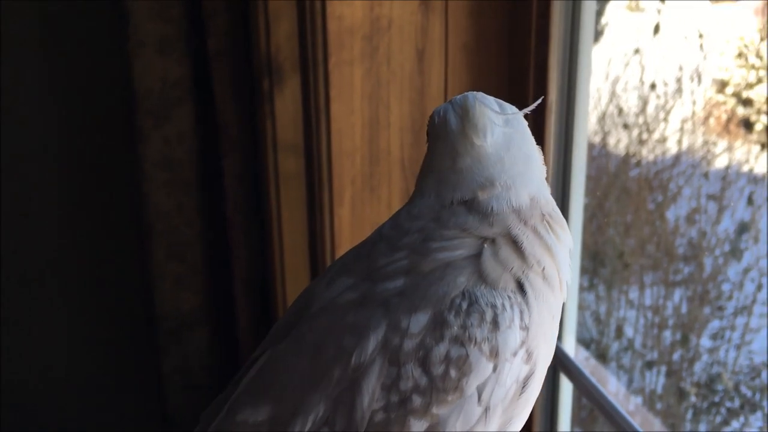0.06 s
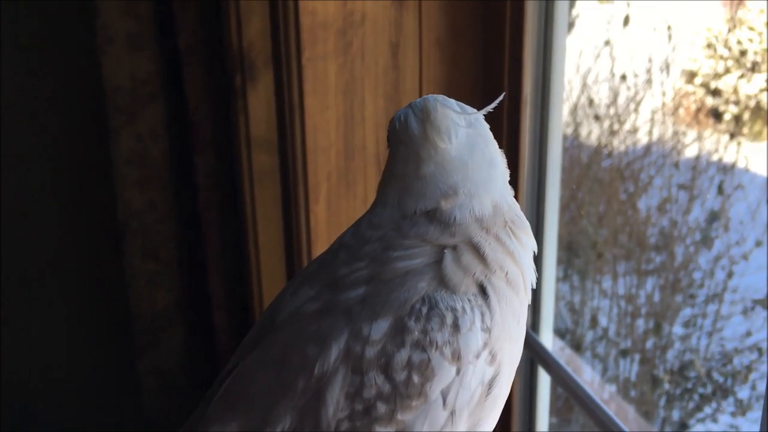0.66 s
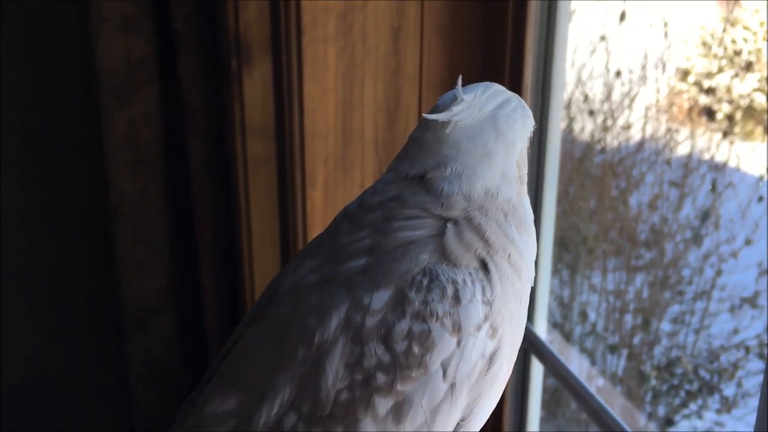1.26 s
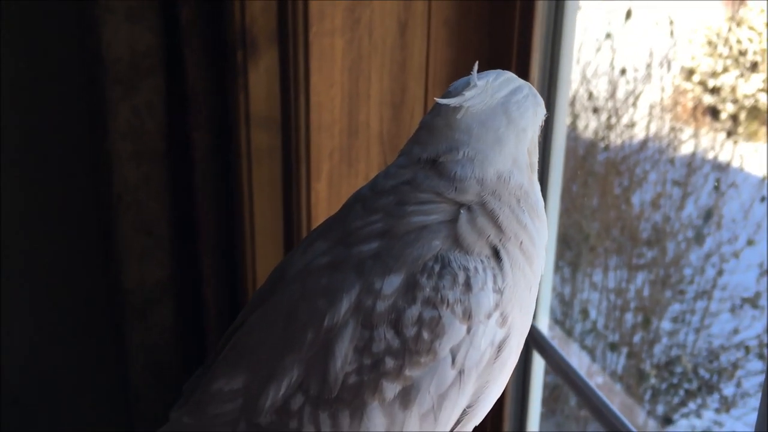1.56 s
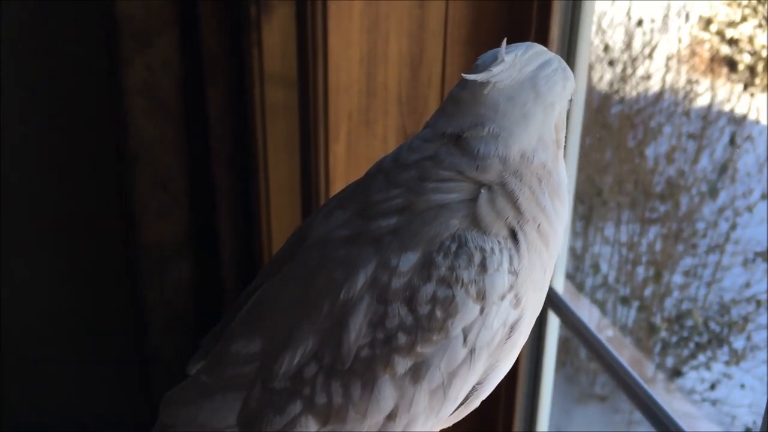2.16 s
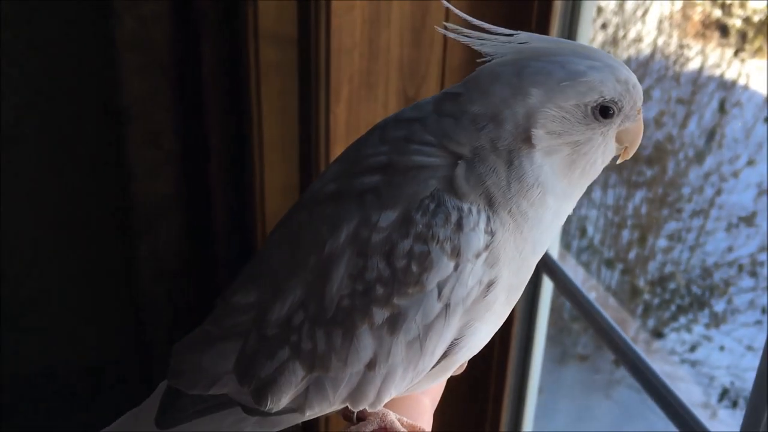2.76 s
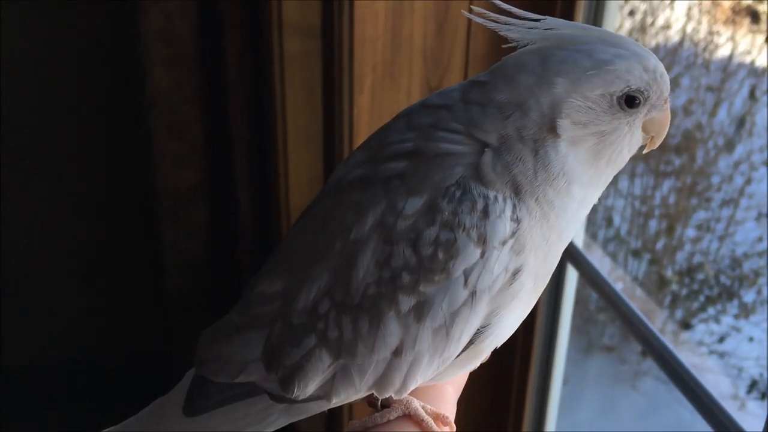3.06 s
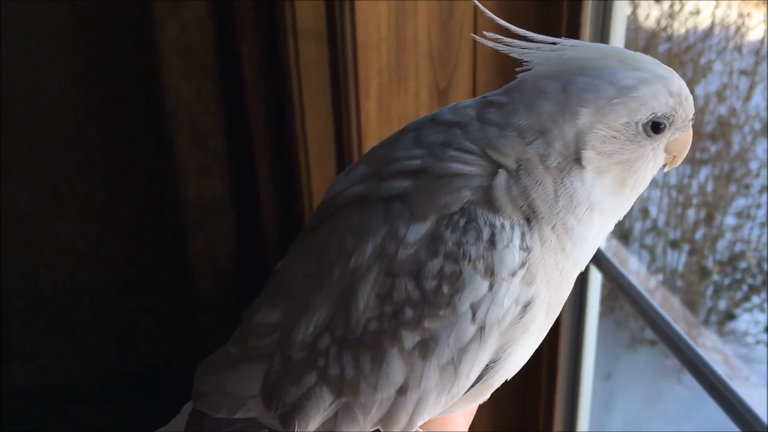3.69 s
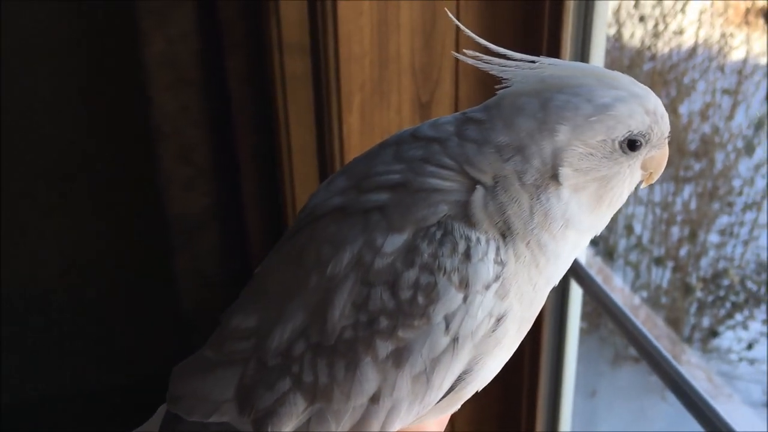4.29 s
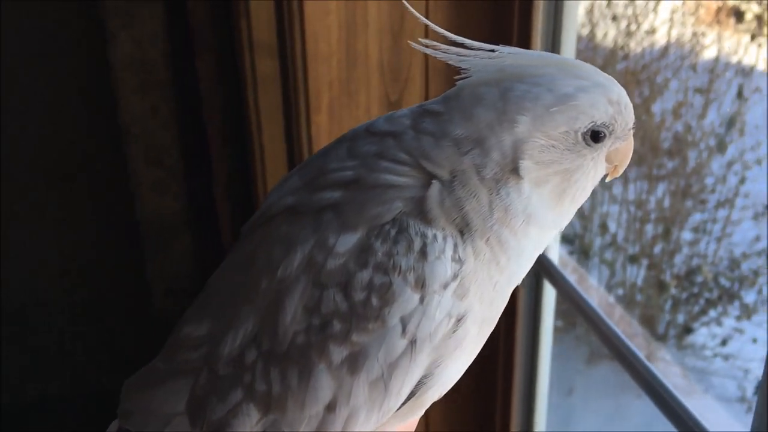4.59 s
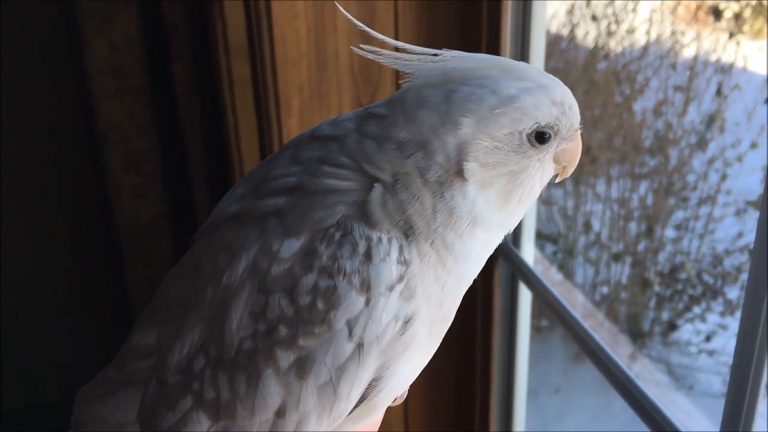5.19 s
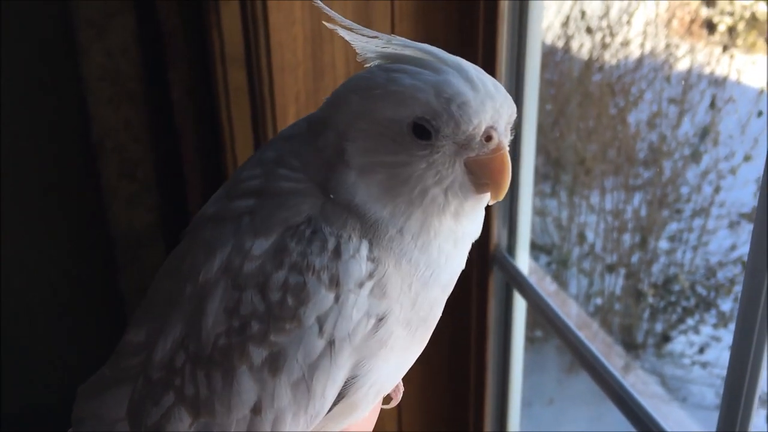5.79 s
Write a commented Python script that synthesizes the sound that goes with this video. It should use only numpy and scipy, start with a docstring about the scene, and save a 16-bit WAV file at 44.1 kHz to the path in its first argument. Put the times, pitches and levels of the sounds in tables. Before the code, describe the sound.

A steady low hum fills a quiet indoor room from start to finish. It comes from a heating blower far off in the house: an even motor drone, a few gently wavering tones above it, and a dull rumble of air in the ducts. A faint, smooth microphone hiss lies underneath.

A small bird is perched near the microphone, but its sounds are tiny and barely rise above the hiss. At about 0.6 seconds it makes one light tick with its beak or claw. Around 3.2 seconds its feathers give a brief, soft, grainy rustle, with two quick high ticks at about 3.3 seconds. A second faint rustle, very slightly squeaky, follows at 3.6 seconds. One last, slightly lower tick comes at about 4.4 seconds, and the blower hums on unchanged.

```python
"""A quiet room in winter, one microphone, a small bird perched nearby. From the start a forced-air
heating blower runs far off in the house: its motor hums at twice the mains rate, its wheel adds
wavering tones, and air rumbles through the ducts. At 0.6 s the bird makes a tiny tick, barely above the
microphone's hiss. Around 3.2 s it shifts its feathers and ticks twice, then shifts again at 3.6 s.
A last tick comes at 4.4 s, and the blower runs on."""
import sys
import numpy as np
from scipy import signal
from scipy.fft import rfft, irfft
from scipy.io import wavfile

SR = 44100
rng = np.random.default_rng(int(sys.argv[2]) if len(sys.argv) > 2 else 0)


def output_pcm(signal):
    """Save a mono or channel-first signal as 16-bit PCM at the path in sys.argv[1].

    Samples are clipped to [-1, 1] before scaling.
    """
    pcm = np.clip(np.atleast_2d(signal).T, -1, 1) * 32767
    wavfile.write(sys.argv[1], SR, np.round(pcm).astype(np.int16))


N = 266672
TIME = np.arange(N) / SR
BIN_HZ = np.maximum(np.arange(N // 2 + 1) * SR / N, 1)


def from_db(db):
    """Decibels to gain."""
    return 10 ** (np.asarray(db) / 20)


def rms_one(x):
    """Scale to an rms of 1."""
    return x / np.sqrt(np.mean(x ** 2))


def spectrum_db(points):
    """Join (f/Hz, level/dB) points by straight lines on a log-frequency axis."""
    hz, db = np.transpose(points)
    return np.interp(np.log(BIN_HZ), np.log(hz), db)


def bell(hz, width_hz):
    """A resonance-shaped bump of height 1 with steep skirts."""
    return 1 / (1 + ((BIN_HZ - hz) / width_hz) ** 2) ** 2


def noise(density):
    """Random noise with the given power per Hz."""
    return irfft(rfft(rng.standard_normal(N)) * np.sqrt(density * SR / 2), N)


def drift(rate_hz):
    """Slow random wandering with a spread of 1."""
    return rms_one(noise(bell(0, rate_hz)))


# Noise floor of the microphone: f/Hz, level/dB per Hz
HISS_FLOOR = [(1000, -113), (3500, -113.5), (6000, -116), (9000, -117.5), (12000, -119.5), (15500, -124)]
# Dips in that floor: f/Hz, width/Hz, gain/dB
HISS_HOLLOWS = [(4960, 360, -4.5), (7550, 1200, -3.5), (10480, 800, -7)]

def microphone_hiss():
    """The microphone's own smooth noise, slightly hollow in three places."""
    dips_db = sum(db * bell(hz, width) for hz, width, db in HISS_HOLLOWS)
    return noise(from_db(spectrum_db(HISS_FLOOR) + dips_db) ** 2)


# Rumble of moving air as it reaches the microphone: f/Hz, level/dB per Hz
AIR_RUMBLE = [(20, -103), (35, -86), (48, -71.5), (64, -77), (130, -76.5), (205, -75.5), (245, -82),
              (330, -87), (410, -87.5), (500, -90.5), (700, -96.5), (1400, -104), (2400, -108),
              (2900, -115), (5000, -125)]
# Duct and room resonances on top of it: f/Hz, width/Hz, level/dB per Hz
DUCT_RESONANCES = [(75, 3.5, -72.5), (96, 4.1, -66), (132.8, 4, -65), (154.4, 3.9, -67.5), (286.5, 8, -70),
                   (324, 23, -72), (539.4, 9.4, -82), (944, 47, -95.5), (1065.6, 12, -92.5),
                   (1263, 20, -100), (2100, 230, -106.5), (2427, 60, -105), (3460, 71, -114)]

def duct_air():
    """Turbulence, dulled on its way through the house, keeps the ducts and the room ringing."""
    ringing = sum(from_db(db) ** 2 * bell(hz, width) for hz, width, db in DUCT_RESONANCES)
    return noise(from_db(spectrum_db(AIR_RUMBLE)) ** 2 + ringing)


# Wheel tones heard from the room: multiple of the shaft rate, rms level/dB, flutter as a share of the tone
WHEEL_TONES = [(3, -56.5, 0.11), (5, -75.5, .4), (10, -77.5, 0.28), (11, -64, 0.49), (15, -59, .35),
               (16, -65.5, 0.21), (18, -71.5, 0.32), (20, -66, 0.53), (22, -69, 1), (54, -81, 0.87)]

def blower_wheel(shaft_hz=18.87, speed_wander=0.00035, wander_hz=0.95, flutter_hz=1.4):
    """Distant tones locked to the shaft; turbulent inflow shakes the strength and phase of each."""
    turns = np.cumsum(shaft_hz * (1 + speed_wander * drift(wander_hz))) / SR
    out = np.zeros(N)
    for multiple, db, flutter in WHEEL_TONES:
        inflow = 1 + flutter * (drift(flutter_hz) + 1j * drift(flutter_hz)) / np.sqrt(2)
        tone = np.exp(2j * np.pi * (round(multiple) * turns + rng.random()))
        out += from_db(db) * rms_one(np.real(inflow * tone))
    return out


# Magnetic hum of the far-off motor: multiple of the mains rate, level/dB relative to hum_db
HUM_PARTIALS = [(2, -.5), (4, -25.5)]

def blower_motor(mains_hz=60, hum_db=-45.5, waver_db=0.85, waver_hz=2.5):
    """The iron is pulled twice in each mains cycle: a hum of steady pitch, wavering slightly in level."""
    hum = np.zeros(N)
    for multiple, db in HUM_PARTIALS:
        cycles = round(multiple) * mains_hz * TIME + rng.random()
        hum += from_db(db) * np.sqrt(2) * np.sin(2 * np.pi * cycles)
    return hum * from_db(hum_db + waver_db * drift(waver_hz))


# Feathers sliding over each other, near the microphone:
# middle t/s, half length/s, rms level/dB, centre f/Hz, width/Hz, squeak rms level/dB
FEATHER_SHIFTS = [(3.233, 0.16, -75.5, 3000, 4000, -90), (3.627, .11, -76, 2300, 2200, -79.5)]
# Resonances of the thin squeak: f/Hz, width/Hz, relative level/dB
SQUEAK_RESONANCES = [(3430, 170, 0), (5850, 300, -12)]

def bird_feathers(grain_db=2.0, grain_hz=110):
    """Each movement swells and fades; barbs catching on one another make it grainy and faintly squeaky."""
    out = np.zeros(N)
    resonances = sum(from_db(db) ** 2 * bell(hz, width) for hz, width, db in SQUEAK_RESONANCES)
    for middle, half_length, db, hz, width, squeak_db in FEATHER_SHIFTS:
        friction = from_db(db) * rms_one(noise(bell(hz, width)))
        squeak = from_db(squeak_db) * rms_one(noise(resonances))
        grain = rms_one(from_db(grain_db * drift(grain_hz)))
        swell = np.exp(-((TIME - middle) / half_length) ** 2)
        out += swell * grain * (friction + squeak)
    return out


# Beak and claws at the nearby perch: t/s, rms level/dB at onset, centre f/Hz, decay/s
PERCH_TICKS = [(0.568, -67, 5900, .003), (3.2851, -71.5, 7400, .008), (3.316, -75, 4800, .003),
               (4.4011, -76, 5500, .005), (4.4011, -65, 1300, .012)]

def bird_ticks(relative_width=0.18):
    """Each tick of beak or claw is a faint scratch that dies away in milliseconds."""
    out = np.zeros(N)
    for onset, db, hz, decay in PERCH_TICKS:
        envelope = (TIME >= onset) * np.exp(-np.abs(TIME - onset) / decay)
        scratch = rms_one(noise(bell(hz, relative_width * hz)))
        out += from_db(db) * envelope * scratch
    return out


def scene():
    """The room from the microphone's position, in mono: the blower distant, the bird nearby."""
    blower = blower_motor() + blower_wheel() + duct_air()
    return (blower + bird_ticks() + bird_feathers())[None, :]


def record(dry):
    """The microphone adds its hiss; the top is cut steeply."""
    cutoff_hz = 15730
    lowpass = signal.ellip(12, .1, 70, cutoff_hz, fs=SR, output="sos")
    return signal.sosfilt(lowpass, dry + microphone_hiss())


dry = scene()
out = record(dry)
output_pcm(out)
```